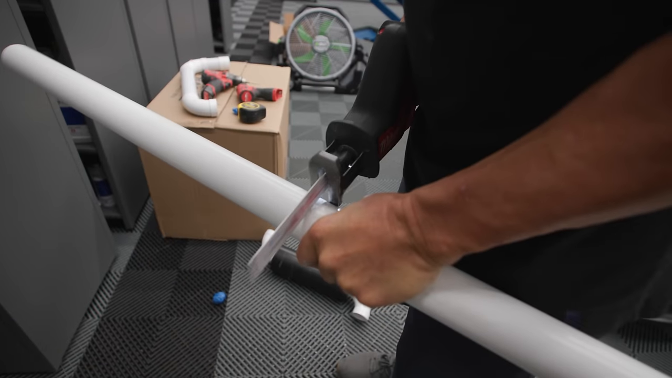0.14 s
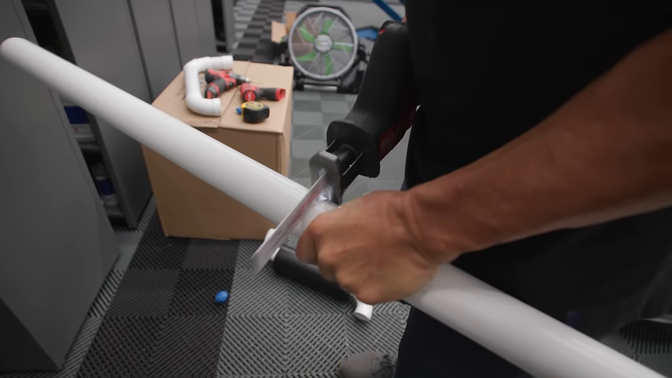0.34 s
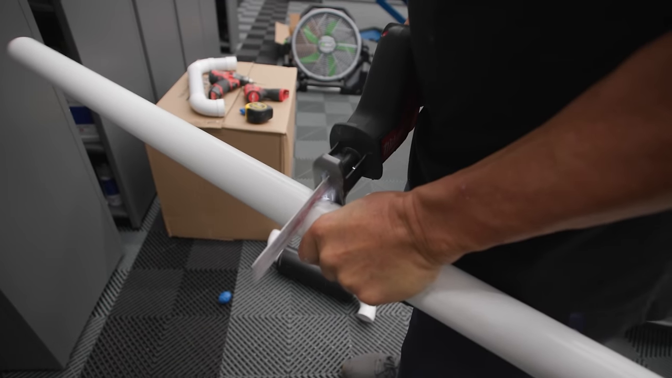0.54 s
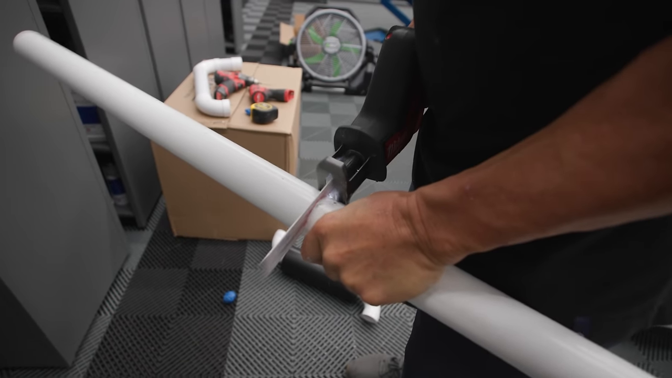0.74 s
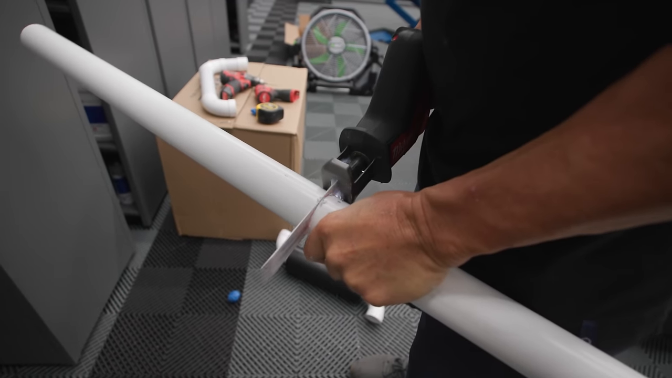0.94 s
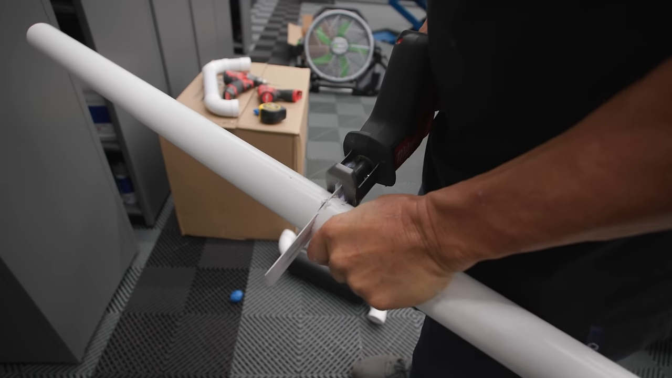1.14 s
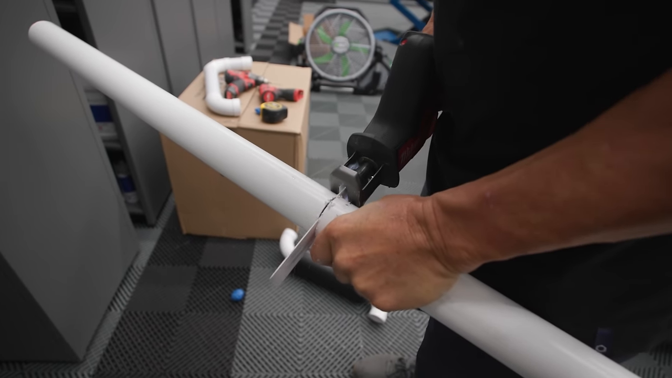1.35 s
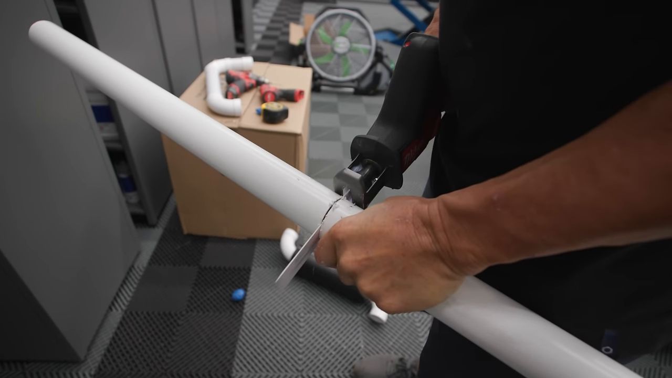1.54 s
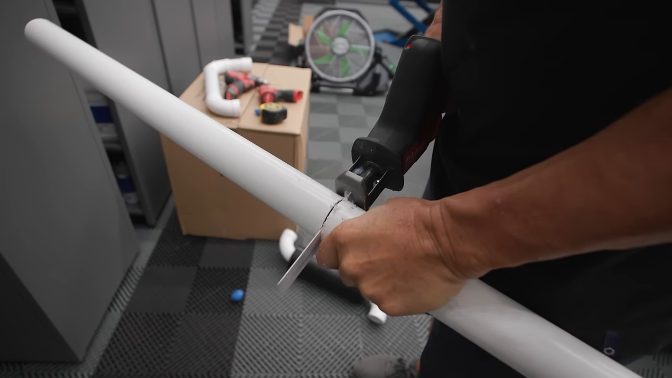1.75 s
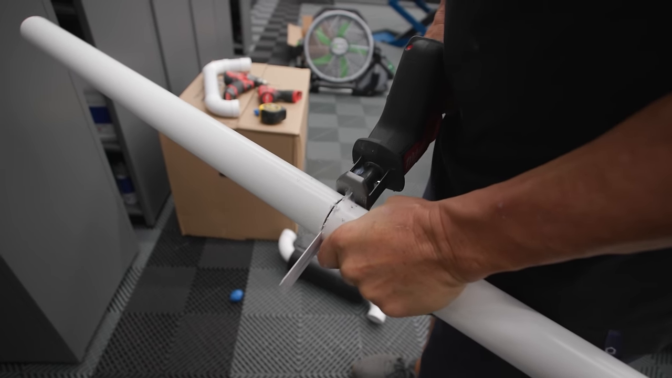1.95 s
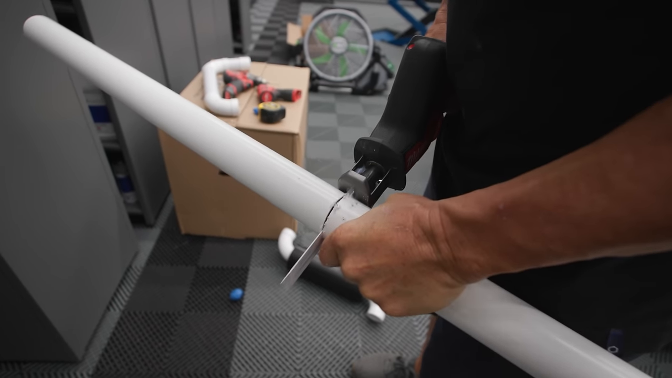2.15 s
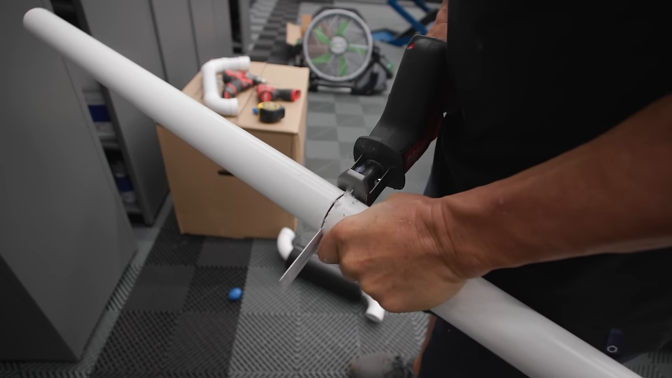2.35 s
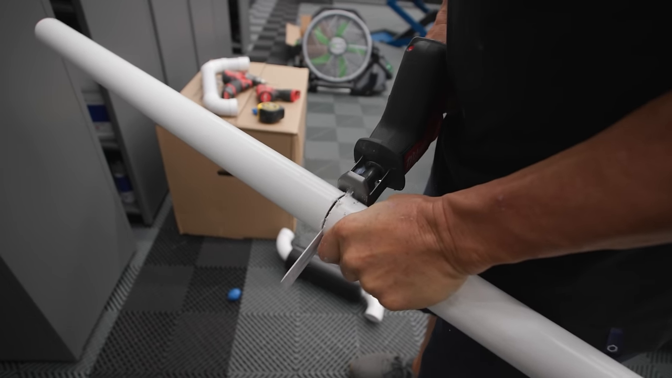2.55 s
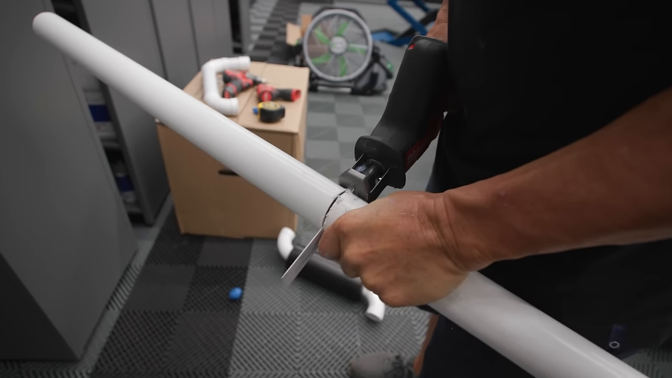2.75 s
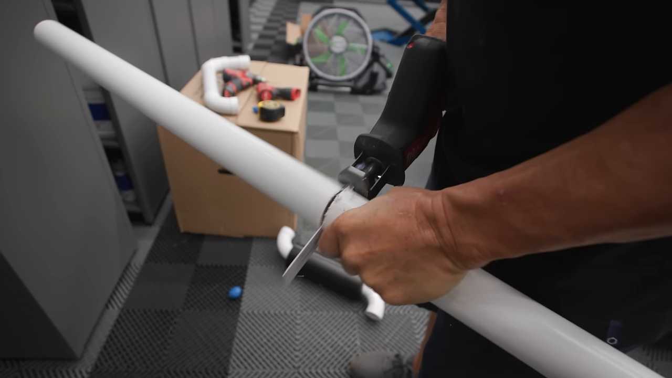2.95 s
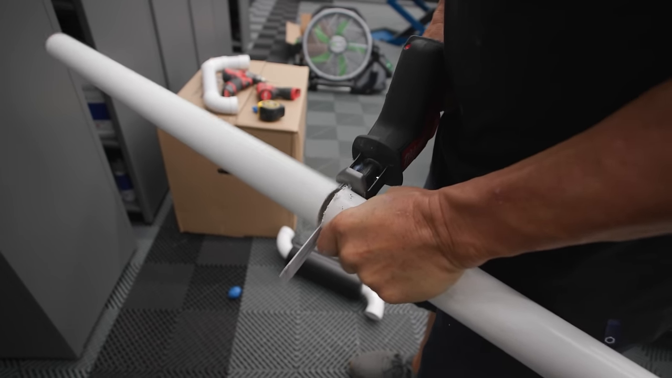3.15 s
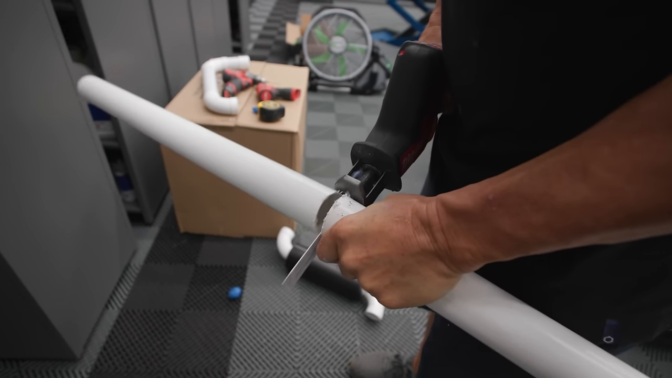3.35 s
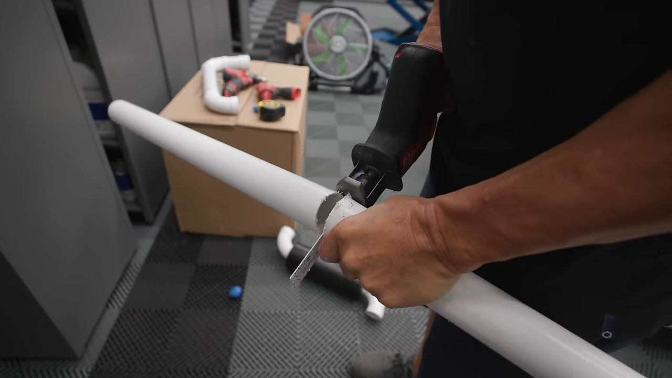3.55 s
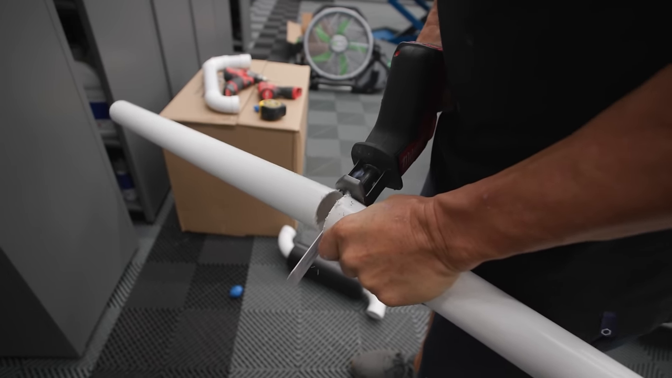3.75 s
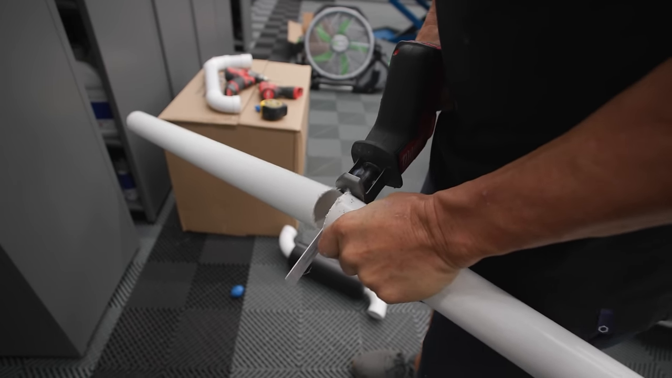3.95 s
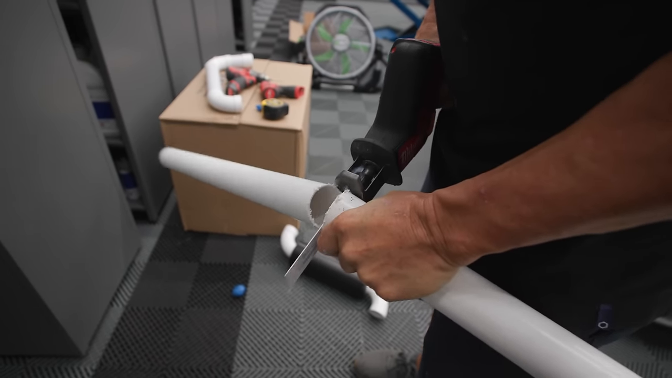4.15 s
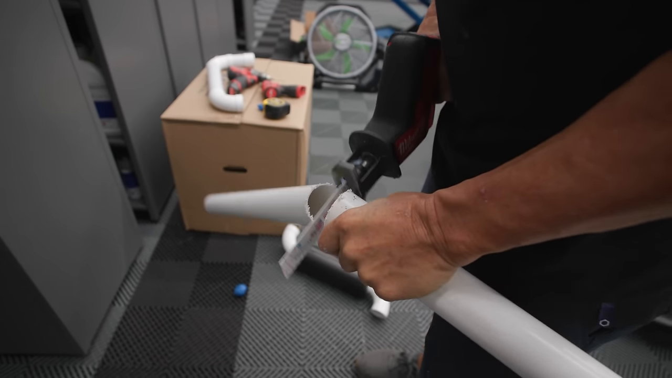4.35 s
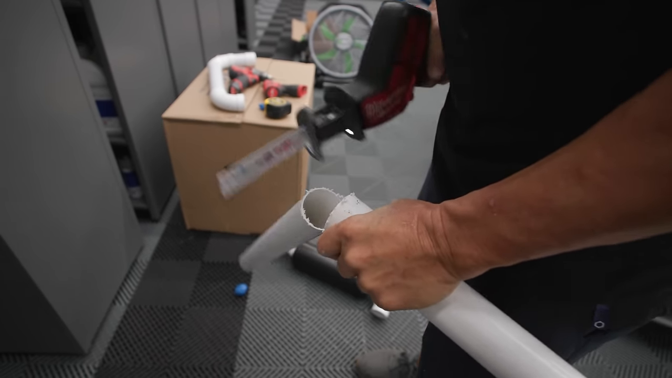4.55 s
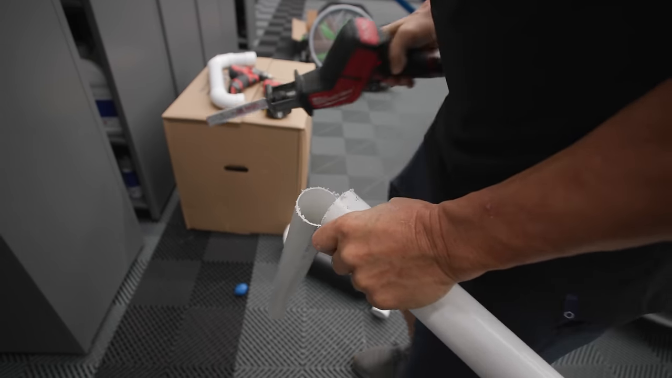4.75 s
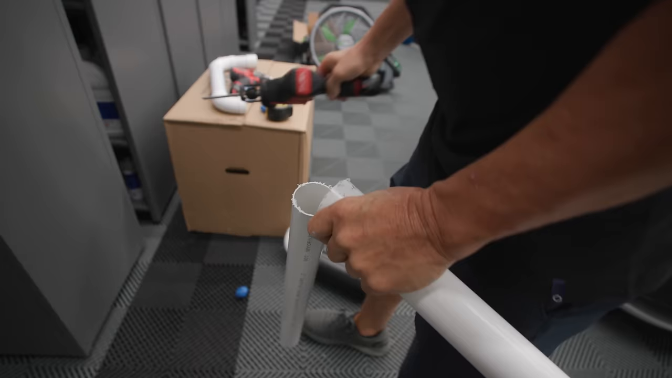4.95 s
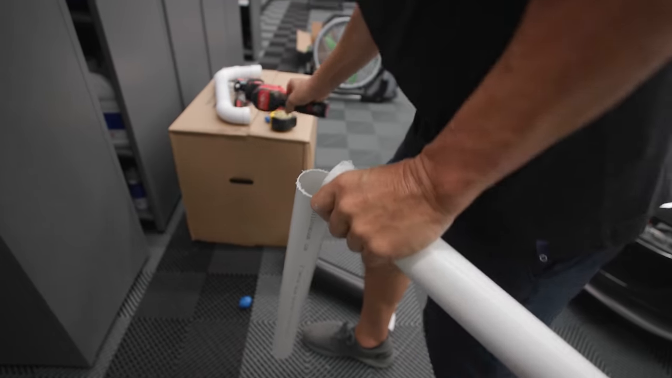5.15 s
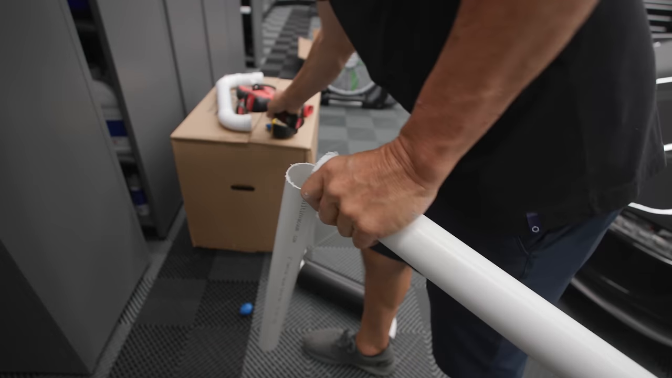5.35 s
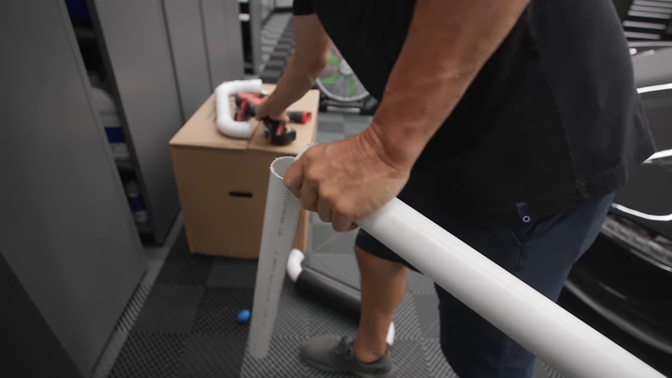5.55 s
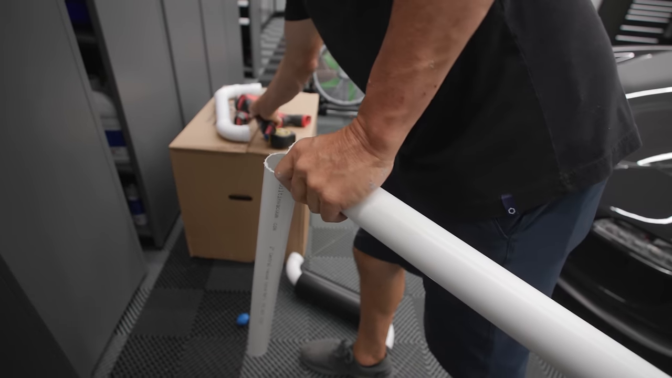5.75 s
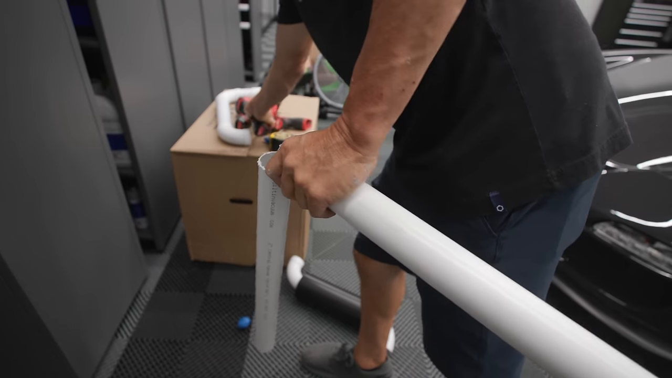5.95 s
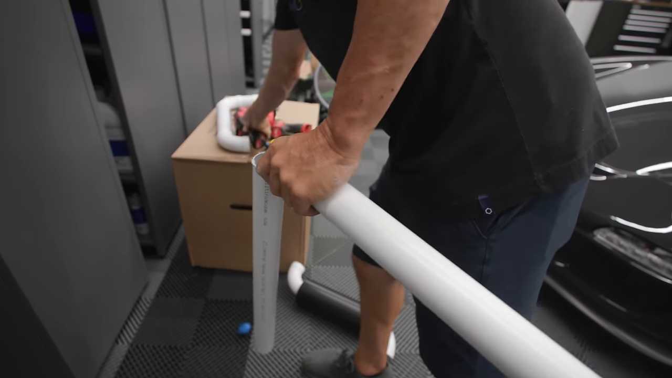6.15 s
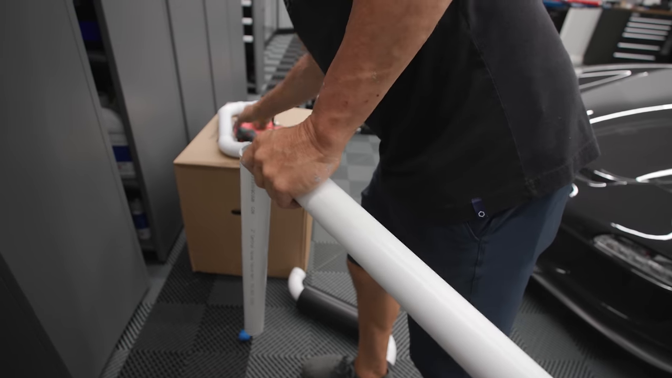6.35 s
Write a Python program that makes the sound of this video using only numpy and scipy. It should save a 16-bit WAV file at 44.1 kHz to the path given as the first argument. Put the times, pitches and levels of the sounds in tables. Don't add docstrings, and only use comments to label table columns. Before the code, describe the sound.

A cordless reciprocating saw rasps rapidly through plastic pipe in a garage, finishes with three short bursts, then the tool is set on a cardboard box.

```python
import sys
import numpy as np
from scipy import signal
from scipy.io import wavfile
from scipy.ndimage import uniform_filter1d

SR = 44100
rng = np.random.default_rng(int(sys.argv[2]) if len(sys.argv) > 2 else 0)


def unload_audio(sound):
    columns = np.transpose(np.atleast_2d(sound))
    steps = np.round(np.clip(columns, -1, 1) * 32767)
    wavfile.write(sys.argv[1], SR, steps.astype(np.int16))


def ratio_of_db(decibels):
    return 10 ** (np.asarray(decibels, float) / 20)


N = 286209

# f/Hz, spectral density/dB
HUM_SPECTRUM = [(15, -28), (25, -5), (93, -4.5), (322, -19), (456, -8), (847, -18), (918, -12), (1020, -51),
                (3920, -46), (6720, -37), (15500, -43)]
HUM_DB = -57.5
# f/Hz, width/Hz, lift/dB
PORT = (4000, 700, 6)
# f/Hz, t60/s
GARAGE_T60 = [(100, 0.59), (600, 0.42), (1800, 0.84), (4500, 0.52), (12000, 0.56)]

# t/s, sleeve level/dB, weight shifting on the box level/dB
HANDLING = [(4.6, -75, -59), (4.81, -73, -60), (4.98, -71, -60), (5.062, -64.5, -54), (5.21, -66, -57),
            (5.452, -57.5, -53.5), (5.56, -68, -54), (5.836, -72, -53), (5.98, -71, -48), (6.14, -68, -52),
            (6.232, -66, -45), (6.368, -64, -37.5), (6.49, -69, -42)]
SLEEVE_LOW_DB, BOX_SCRAPE_DB = 8, -6
BRUSH_DB, BRUSH_FOLLOW = -62.5, 0.29
# t/s, peak level/dB, f/Hz, length/s
THUMPS = [
    (4.767, -52, 128, 0.032),
    (5.614, -25.5, 94, 0.03),
    (5.648, -29.5, 112, 0.01),
    (5.701, -37, 110, .02),
    (5.934, -30, 110, 0.04),
    (6.193, -10.5, 149, 0.0207),
    (6.328, -19, 144, 0.014),
    (6.389, -26, 140, 0.018),
]
# t/s, peak level/dB, centre f/Hz, width/Hz, t60/s
TICKS = [(4.775, -52, 10000, 6000, .07), (5.013, -30.5, 880, 714, 0.087), (5.018, -40, 5000, 9000, .04),
         (5.614, -31, 900, 1300, 0.079), (5.619, -19, 3500, 2370, 0.019), (5.81, -40, 12000, 6000, .01),
         (5.926, -36, 3000, 4000, .01), (5.955, -49, 4300, 2500, 0.17), (5.065, -49, 9000, 7000, .08),
         (6.188, -8.5, 900, 500, 0.022), (6.188, -13.5, 630, 403, 0.058), (6.189, -10, 3000, 3600, 0.025),
         (6.189, -29, 13000, 5000, .02), (6.209, -36, 2500, 2500, 0.27), (6.33, -26, 1200, 1770, 0.043),
         (6.386, -23.5, 3060, 1500, 0.021), (6.386, -27.5, 8200, 1500, 0.011)]

# full speed t/s, release t/s, level re the last feed/dB, spin-up/(dB per s)
PULLS = [
    (-1.0, 3.552, 0.0, 600),
    (3.743, 3.893, -0.4, 700),
    (4.025, 4.15, -.4, 290),
    (4.248, 4.365, -5.5, 520),
]
PRESS_DB_PER_S, BRAKE_DB_PER_S, IDLE_DB = 23.5, 800, -35
RUNDOWN_DB, RUNDOWN_DB_PER_S = -24, 38
WHINE_HZ = [3780, 10000]
JOLT_S, JOLT_DB, BRAKING_DB = .024, -20.5, -27
COAST_DB, COAST_DB_PER_S = -47, 27
FAN_DB, FAN_RISE_DB_PER_S = -48, 34

# t/s, strokes done so far
STROKES = [(0, 0), (.3, 11.15), (.6, 22.42), (.9, 33.81), (1.2, 45.39), (1.5, 57.17), (1.8, 69.15),
           (2.1, 81.1), (2.3, 89), (2.7, 105.3), (3, 117.28), (3.15, 123.12), (3.45, 134.58), (4.6, 178)]
# t/s, level/dB
GRIP = [(0.0, -44.5), (.22, -41.5), (.67, -50), (1.15, -54.5), (1.65, -55), (1.88, -50), (2.22, -49),
        (2.34, -57), (2.56, -47), (2.84, -49.5), (2.95, -44), (3.07, -48), (3.18, -43), (3.44, -55),
        (3.83, -53)]
ORDERS_DB = [-0.2, -11.5, -10.5, -14, -10, -15, -15, -14, -11.5, -9, -10]
SKATE_S = [0.72, 1]
SKATE_DB = 7
# t/s, level/dB
FLAP = [(0.0, -57), (.09, -44), (.22, -57), (.85, -74), (1.2, -70), (1.55, -57), (1.85, -62), (2.17, -72),
        (2.32, -56), (2.84, -53.5), (2.95, -48), (3.18, -52), (3.5, -56), (3.8, -64)]
FLAP_SECOND_DB = 1

# t/s, feed level/dB, bite (0-1, share of sound in the slap)
CUT = [(0.0, -23, 0.2), (.09, -18, 0.35), (.29, -20.5, 0.39), (.54, -20.5, 0.27), (.93, -23, 0.44),
       (1.21, -23.5, .44), (1.58, -25.5, 0.33), (1.83, -19.5, .34), (1.89, -25, .4), (2.33, -27.5, .25),
       (2.49, -22.5, 0.18), (2.88, -26, 0.12), (2.98, -23, 0.22), (3.25, -20.5, .26), (3.33, -24, 0.19),
       (3.55, -25, 0.14)]
# t/s, peak level/dB
SNAGS = [(3.7231, -22), (3.7376, -28), (3.8152, -7), (3.972, -15), (3.9876, -10.5), (4.014, -21),
         (4.0609, -6), (4.0866, -5), (4.131, -23), (4.2416, -24), (4.3013, -9), (4.3598, -6)]
# f/Hz, level/dB
RASP = [(90, -45), (150, -22.5), (313, -14), (490, 1), (1000, -2.5), (2000, 1.5), (3600, 1), (4400, -3),
        (5400, -5), (5800, -10), (8000, -9), (10700, -15.5), (13800, -25), (15500, -34)]
STAGE_S = [.3, .65, 1.15, 1.85, 2.6, 3.2, 3.75]
# f/Hz, width/Hz, level/dB
STAGE_MODES = [
    [(544, 77, 0), (900, 66, 0)] + [(1930, 22, -3.0), (3100, 110, -3), (3810, 260, -1.5), (5610, 220, -6), (6220, 68, -5)],
    [(540, 41, 0), (936, 55, 0)] + [(1710, 34, -4), (1990, 27, 1.5), (2420, 160, -1.5), (2915, 59, 1.5), (5190, 95, -2)],
    [(2020, 105, 0.5), (2424, 67, 2.5), (3590, 360, 0.5), (4820, 430, -6.5), (5300, 88, -1), (6000, 46, -5)],
    [(1200, 62, -5.5), (2050, 86, -5.5), (2560, 68, -4), (3500, 40, -1), (5100, 170, -4), (6040, 160, -8.5)],
    [(1650, 99, -2), (2240, 350, -4.5), (2890, 90, -1), (4980, 110, -8)],
    [(685, 260, -8), (1180, 54, -8.5), (2280, 190, -6), (3520, 86, -7), (5100, 170, -5.5)],
    [(830, 100, -4.5), (1550, 250, .4), (2880, 69, 2.5), (3690, 82, 1), (4980, 97, -8)],
]
STAGE_HISS_DB = [-12.5, -14.5, -6.5, -10.5, -8, -10.5, -12]
BOOM_DB, BOOM_DB_PER_BITE = -7.5, -23.5
CRACK_S, CRACK_DB, SETTLE_S = 2.9, 7, 0.28
LAST_STRIP_DB = -3
# t/s, level/dB
WALL = [(.92, -56), (1.11, -38), (1.5, -39), (2.0, -33.5), (2.32, -39), (2.54, -33), (2.7, -39), (2.9, -37)]
WALL_HZ = 1200
# t/s, f/Hz, level/dB
SQUEAL = [(0, 1500, -40), (.05, 1530, -31), (.11, 1640, -28), (.3, 1655, -30), (.44, 1625, -30),
          (.5, 1630, -38), (.7, 1660, -39), (.8, 1650, -50)]
THUD_HZ = [440, 1150]
THUD_S, THUD_SHARE_PER_BITE = .007, 1.7


def evened(x):
    return x / np.sqrt(np.mean(x ** 2) + 1e-20)


def read(points, hz):
    f, value = np.transpose(points)
    return np.interp(np.log(hz + 1), np.log(f + 1), value)


def curves(rows, off_db=None):
    s, *columns = np.transpose(rows)
    return [np.interp(np.arange(N) / SR, s, c, off_db, off_db) for c in columns]


def add(mix, s, sound):
    part = mix[round(s * SR):][:len(sound)]
    part += sound[:len(part)]


def colour(x, gain):
    log = np.log(np.maximum(gain, 1e-5))
    full = signal.hilbert(np.concatenate([log, log[-2:0:-1]]))
    response = np.fft.ifft(np.exp(np.conj(full))).real
    return signal.oaconvolve(x, response)[:len(x)]


def band(x, lo_hz, hi_hz):
    return evened(signal.sosfilt(signal.butter(N=2, Wn=[lo_hz, hi_hz], btype="band", fs=SR, output="sos"), x))


def wander(per_s):
    return evened(signal.resample(rng.standard_normal(int(N / SR * per_s)), N))


def resonate(x, hz, width):
    turn, r = np.exp(2j * np.pi * np.cumsum(hz) / SR), np.exp(-np.pi * width / SR)
    return evened((turn * signal.lfilter([1 - r], [1, -r], x / turn)).real)


def hum():
    air = colour(rng.standard_normal(N), ratio_of_db(read(HUM_SPECTRUM, np.fft.rfftfreq(4096, 1 / SR))))
    return ratio_of_db(HUM_DB + 1.4 * wander(3)) * evened(air)


def through_port(x):
    hz = np.fft.rfftfreq(4096, 1 / SR)
    port_hz, width, lift_db = PORT
    return colour(x, ratio_of_db(lift_db / (1 + (2 * (hz - port_hz) / width) ** 2)))


def garage(x):
    taps = np.zeros(SR)
    at = np.arange(300, SR - 20, 20)
    taps[at + rng.integers(0, 20, at.shape)] = rng.choice([-1., 1.], at.shape)
    hz, t, z = signal.stft(taps, SR, nperseg=256)
    decay = ratio_of_db(-60 * t / read(GARAGE_T60, hz)[:, None])
    tail = signal.istft(z * decay, SR, nperseg=256)[1]
    return signal.fftconvolve(x, tail / np.linalg.norm(tail))[:N]


def rustle():
    grit = rng.standard_normal((5, N)) * ratio_of_db(1.1 * wander(70))
    edges_hz = [(45, 180), (240, 900), (300, 2300), (2600, 5600), (6000, 13500)]
    sleeve, box = ratio_of_db(curves(HANDLING, -97))
    scrape, swish = ratio_of_db(BOX_SCRAPE_DB) * box, ratio_of_db(SLEEVE_LOW_DB) * sleeve
    started = np.arange(N) / SR > HANDLING[0][0]
    brush = ratio_of_db(BRUSH_DB) * (np.hypot(scrape, swish) / ratio_of_db(-55.5)) ** BRUSH_FOLLOW * started
    levels = [box, scrape, swish, brush, sleeve]
    return sum(level * band(g, *hz) for level, g, hz in zip(levels, grit, edges_hz))


def knocks():
    out, t = np.zeros((2, N)), np.arange(4410) / SR
    for s, db, hz, length in THUMPS:
        held = np.clip(t / 0.0022, 0, 1) * np.exp(-np.maximum(t - length, 0) / 0.0013 - t / 0.026)
        add(out[0], s, -ratio_of_db(db) * held * np.sin(2 * np.pi * hz * t))
    out[1] = out[0]
    for s, db, hz, width, t60 in TICKS:
        edges_hz = max(hz - width / 2, 200), min(hz + width / 2, 16000)
        decay = ratio_of_db(db - 60 * t / t60) * np.clip(t / 0.00053, 0, 1)
        crack = .5 * decay * band(rng.standard_normal(len(t)), *edges_hz)
        add(out[0], s, crack)
        click = band(1. * (t == 0), *edges_hz)
        add(out[1], s, np.sqrt(np.mean(crack ** 2)) * click)
    return out


def trigger():
    t = np.arange(N) / SR
    pulls = []
    for on, off, db, spin_up in PULLS:
        rise = np.minimum(spin_up * (t - on), 0)
        press = (on > 0) * PRESS_DB_PER_S * np.clip(t - on, 0, off - on)
        pulls.append(db + rise + press - BRAKE_DB_PER_S * np.maximum(t - off, 0))
    after = t - PULLS[-1][1]
    floor = np.where(after < 0, IDLE_DB, RUNDOWN_DB - RUNDOWN_DB_PER_S * after)
    return np.maximum(np.max(pulls, axis=0), floor)


def gear():
    t = np.arange(N) / SR
    light = np.clip((t - 3.45) / .1, 0, 1)
    mesh = light * ratio_of_db(COAST_DB - COAST_DB_PER_S * np.maximum(t - PULLS[-1][1], 0))
    for on, off, _, spin_up in PULLS:
        mesh = mesh + ratio_of_db(JOLT_DB) * np.exp(-abs(t - on + 4 / spin_up) / JOLT_S)
        mesh = mesh + ratio_of_db(BRAKING_DB) * np.exp(-abs(t - off + .01) / JOLT_S)
    fan = light * ratio_of_db(FAN_DB + 1.35 * trigger() + FAN_RISE_DB_PER_S * np.minimum(t - PULLS[1][0], .6))
    return sum(level * ratio_of_db(-under_db) * resonate(rng.standard_normal(N), np.full(N, hz), 150)
               for level, hz, under_db in zip([mesh, fan], WHINE_HZ, [7.5, 14]))


def shake():
    t = np.arange(N) / SR
    (turns,) = curves(STROKES)
    grip_db, flap_db = curves(GRIP)[0] + trigger(), curves(FLAP)[0] + trigger()
    skate_db = np.interp(t, SKATE_S, [SKATE_DB, 0])
    levels_db = [flap_db, flap_db + FLAP_SECOND_DB] + [grip_db + db for db in ORDERS_DB]
    levels_db[3:5] = [db + skate_db for db in levels_db[3:5]]
    unsteady = np.interp(t, [3.4, 3.7], [0, 2.5])
    out = np.zeros(N)
    for order, db in enumerate(levels_db, 1):
        level = np.sqrt(2) * ratio_of_db(db + 2 * wander(9))
        out += level * np.sin(2 * np.pi * order * turns + .4 * wander(7) + unsteady * wander(30))
    return out


def squeal(u):
    hz, db = curves(SQUEAL)[0], curves(SQUEAL, -90)[1]
    burst = np.exp(-((u - .68) / .18) ** 2) * ratio_of_db(2.5 * wander(40))
    phase = 2 * np.pi * np.cumsum(hz * (1 + .012 * wander(60))) / SR
    return ratio_of_db(db) * evened(burst * np.sin(phase))


def shoe():
    marks = ratio_of_db(1.5 * wander(12)) * (np.diff(np.floor(curves(STROKES)[0] + .15), prepend=0) > 0)
    t = np.arange(1500) / SR
    thud = rng.standard_normal(len(t)) * np.exp(-t / THUD_S)
    return marks, band(signal.oaconvolve(marks, thud)[:N], *THUD_HZ)


def teeth(bite):
    (turns,) = curves(STROKES)
    chance = rng.standard_normal((200, 3))[(turns + .16).astype(int)]
    u = (turns + .16 + .015 * chance[:, 0]) % 1
    contact = np.interp(np.arange(N) / SR, [.35, .6], [.08, .17])
    strength = ratio_of_db(1.4 * chance[:, 1])
    slap = strength * (1 - np.exp(-u / .04)) * np.exp(-u / contact)
    drag = ratio_of_db(1.5 * chance[:, 2]) * np.exp(-((u - .48) / .14) ** 2)
    bite = np.clip(bite, 0, 1)
    chips = evened(rng.standard_normal(N) * ratio_of_db(1.96 * np.minimum(rng.exponential(1, N), 5)))
    same_teeth = rng.standard_normal(1100)[(turns % 1 * 1100).astype(int)]
    struck = .85 * same_teeth + .52 * chips
    turning = 1 - .9 * bite * np.exp(-((u - .95) / .12) ** 2)
    scrape = (1 - bite) * turning * ratio_of_db(1.2 * wander(160)) * chips
    grind = scrape + bite * (5.0 * slap + 0.5 * drag) * struck
    first = .5 * strength * (np.diff(np.floor(turns + .1), prepend=0) > 0)
    catches = slap * rng.standard_normal(N) * (rng.random(N) < 1500 / SR)
    return grind, bite * (first + catches), u


def saw():
    t = np.arange(N) / SR
    feed_db, bite = curves(CUT)
    feed_db = feed_db + trigger()
    since = t - CRACK_S
    crack_db = CRACK_DB * np.clip(since / .03, 0, 1) * np.exp(-np.maximum(since, 0) / SETTLE_S)
    boom_db = BOOM_DB + BOOM_DB_PER_BITE * bite + crack_db + LAST_STRIP_DB * (t > PULLS[0][1])
    hiss_db = np.interp(t, STAGE_S, STAGE_HISS_DB)

    drive, kicks, u = teeth(bite)
    for s, db in SNAGS:
        add(drive, s, 5.23 * ratio_of_db(db + 6) * rng.standard_normal(88) * np.exp(-np.arange(88) / 35))

    hz = np.fft.rfftfreq(4096, 1 / SR)
    depth = np.interp(t, STAGE_S, np.arange(len(STAGE_MODES)))
    pipe = np.zeros(N)
    for k, modes in enumerate(STAGE_MODES):
        rings = sum(ratio_of_db(2 * db) / (1 + (hz - f) ** 2 / width ** 2) ** 2 for f, width, db in modes)
        body = np.sqrt(ratio_of_db(2 * read(RASP, hz)) + ratio_of_db(4) * rings)
        bursts = sum(ratio_of_db(db) / (1 + (hz - f) ** 2 / (width / 2 + 70) ** 2) for f, width, db in modes)
        voiced = evened(colour(drive, body)) + .42 * evened(colour(kicks, bursts + 1e-3))
        near = np.clip(1 - abs(depth - k), 0, 1)
        pipe += np.sin(np.pi / 2 * near ** 2 * (3 - 2 * near)) * evened(voiced)

    boom = signal.filtfilt(*signal.butter(N=2, Wn=850, fs=SR), pipe)
    hiss = signal.filtfilt(*signal.butter(N=2, Wn=6200, btype="high", fs=SR), pipe)
    marks, thuds = shoe()
    share = np.clip(THUD_SHARE_PER_BITE * bite, 0, .9)
    low = np.sqrt(1 - share ** 2) * evened(boom) + share * thuds
    cut = ratio_of_db(feed_db) * (pipe - boom - hiss + ratio_of_db(boom_db) * low + ratio_of_db(hiss_db) * evened(hiss))

    wall = resonate(drive + 8 * kicks + 170 * marks, np.full(N, WALL_HZ), 40)
    wall = wall / np.sqrt(uniform_filter1d(wall ** 2, 2200) + .1)
    return cut + ratio_of_db(curves(WALL, -90)[0]) * wall + squeal(u)


def scene():
    tool = saw() + gear()
    blows, far_blows = knocks()
    echo = garage(ratio_of_db(-10) * tool + ratio_of_db(-10.0) * far_blows)
    return (tool + blows + echo + shake() + through_port(rustle() + hum()))[None]


def band_limit(x):
    return signal.sosfilt(signal.butter(12, 15610, fs=SR, output="sos"), x)


def record(dry):
    over = np.maximum(abs(dry) - .28, 0)
    held = np.sign(dry) * (abs(dry) - over + .14 * np.tanh(over / .14))
    treble_db = 10 * np.log10(abs(uniform_filter1d(np.diff(held, prepend=0) ** 2, 256)) + 1e-12)
    starved = (uniform_filter1d(treble_db, 16384) > -50) & (wander(25) < 1.6)
    starved = uniform_filter1d(1. * starved, 512)
    dulled = signal.sosfiltfilt(signal.cheby2(N=16, rs=40, Wn=14600, fs=SR, output="sos"), held)
    return band_limit(starved * dulled + (1 - starved) * held)


dry = scene()
out = record(dry)
unload_audio(out)
```